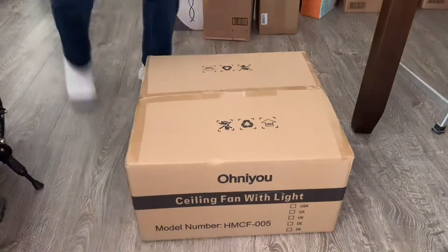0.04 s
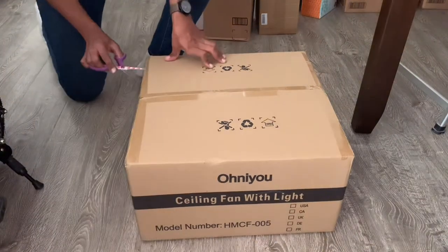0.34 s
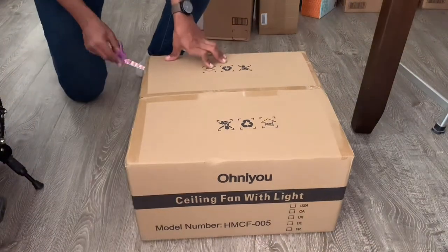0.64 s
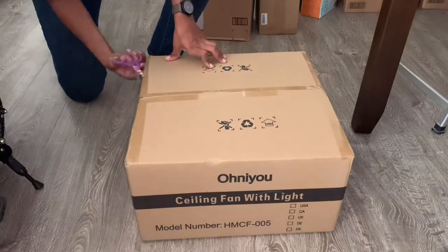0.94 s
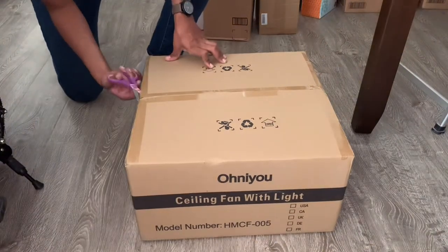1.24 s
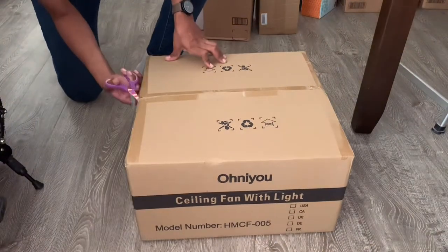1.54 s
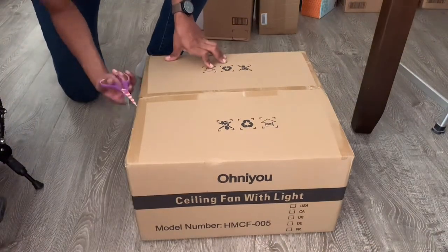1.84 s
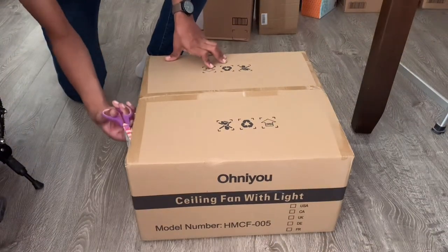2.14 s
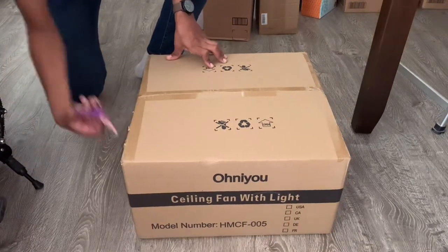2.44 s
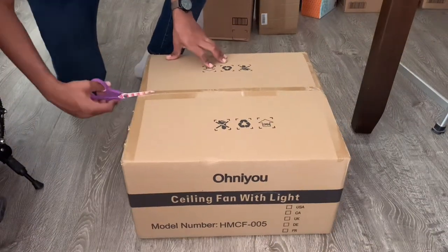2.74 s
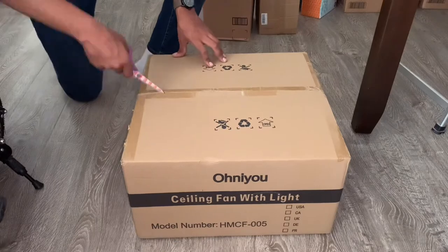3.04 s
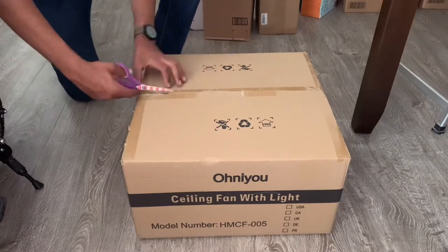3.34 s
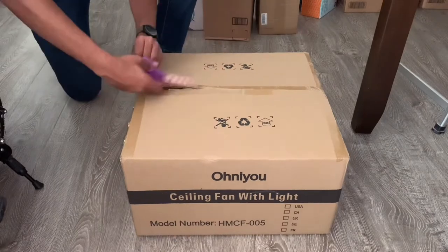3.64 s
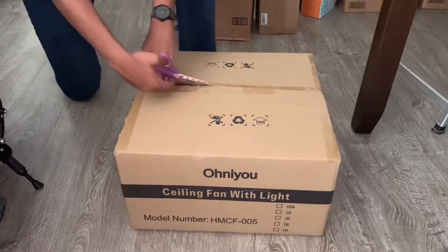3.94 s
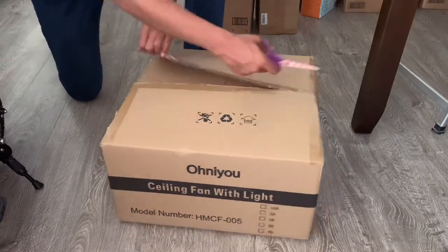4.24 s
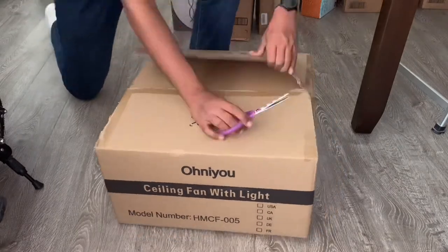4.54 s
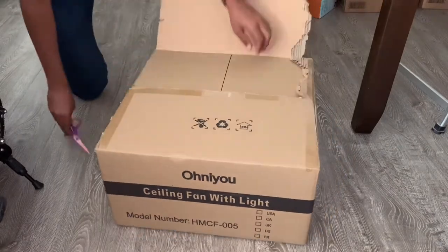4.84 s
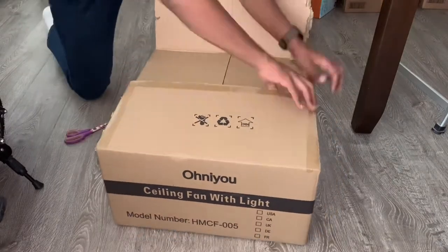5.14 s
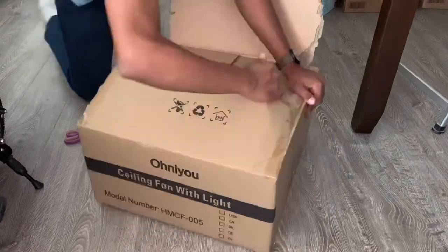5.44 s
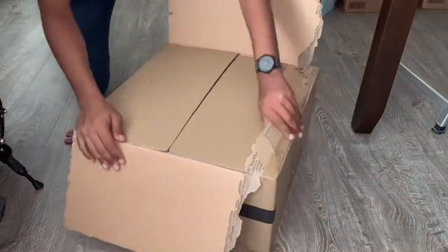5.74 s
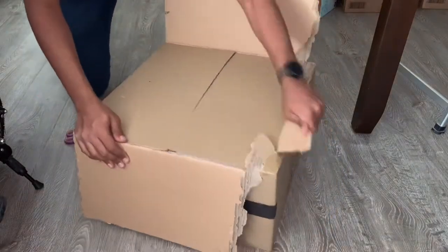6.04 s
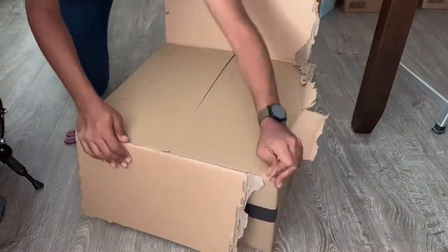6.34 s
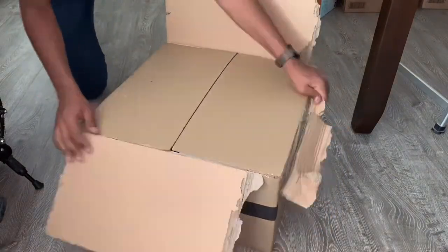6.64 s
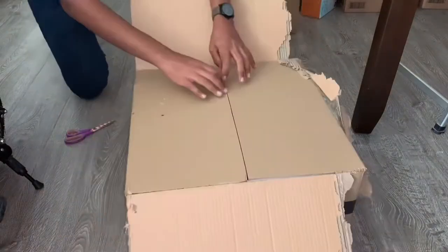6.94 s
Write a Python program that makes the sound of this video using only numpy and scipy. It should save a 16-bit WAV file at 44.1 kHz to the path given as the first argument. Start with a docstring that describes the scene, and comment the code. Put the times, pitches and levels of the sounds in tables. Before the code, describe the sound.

Scissors scrape along the tape of a cardboard box, poking and sawing so that tape and board snap and tear in short bursts. The cracks grow louder, with hands bumping the hollow box. The scissors clatter lightly onto the floor, then the flaps are ripped open, rubbing and knocking. It sounds close, in a small quiet room with faint far traffic and a distant motor.

```python
"""Scissors open a taped cardboard box on a wooden floor, in a small room with far traffic.
The blade rubs along the tape; from 0.5 s it pokes and saws, and tape and board snap and tear in bursts
of fibre breaks. Each force rings the panels and the hollow box. From 1.5 s a faint distant motor rises
and falls, and hands start to bump the box. At 4.3-5 s the scissors clatter in the hand and on the
floor. Then the flaps are ripped open, scraping and knocking."""
import sys
import numpy as np
from scipy import signal
from scipy.fft import rfft, irfft, next_fast_len
from scipy.io import wavfile

SR = 44100
rng = np.random.default_rng(int(sys.argv[2]) if len(sys.argv) > 2 else 0)


def bounce(signal):
    """Save signal as a 16-bit WAV file at the path given by the first command-line argument."""
    frames = np.transpose(np.atleast_2d(signal))
    limited = np.clip(frames, -1, 1)
    pcm = np.round(limited * 32767).astype(np.int16)
    wavfile.write(sys.argv[1], SR, pcm)


N = 316505
SIZE = 8192  # samples per event
LEAD_S, BLOW_S = 0.01, 0.01  # lead-in of an event; time over which a blow's level holds

# body, crack and hiss ranges: low f/Hz, high f/Hz
RANGES = [(180, 800), (800, 4000), (4000, 16000)]
# force spectrum of tears and scissor ticks: f/Hz, gain/dB
SHARP_COLOUR = [(25, -38), (110, -35), (170, -43), (260, -20), (600, -14), (1500, -8), (3500, -4.5),
                (5000, 1), (9000, 2.5), (16000, 1.5)]


def undb(db):
    """Decibels to gain."""
    return 10 ** (np.asarray(db) / 20)


def bins(size):
    """FFT frequencies in Hz, floored at 1."""
    return np.maximum(np.arange(size // 2 + 1) * SR / size, 1)


def shape(points, hz):
    """Gain of an (f/Hz, gain/dB) curve on a log-frequency axis."""
    f, db = np.transpose(points)
    return undb(np.interp(np.log(hz), np.log(f), db))


def walk(rate_hz):
    """Gaussian values at rate_hz, joined by straight lines."""
    steps = np.arange(0, N / SR + 1, 1 / rate_hz)
    return np.interp(np.arange(N) / SR, steps, rng.standard_normal(len(steps)))


def add(out, start_s, wave):
    """Mix a wave in at start_s."""
    i = max(int(start_s * SR), 0)
    out[:, i:i + wave.shape[1]] += wave[:, :max(N - i, 0)]


def resonance(hz, centre_hz, width_hz, lift_db):
    """Causal resonant peak or dip."""
    return 1 + (undb(lift_db) - 1) / (1 + 1j * (hz ** 2 - centre_hz ** 2) / (hz * width_hz))


def stereo(pair, hz):
    """Mid and side spectra to left and right; treble spreads wider."""
    # side against mid: f/Hz, gain/dB
    width = [(100, -19), (300, -14), (1100, -13), (2200, -5.5), (4500, -2.5), (14000, -0.5)]
    return pair[0] + np.array([[1], [-1]]) * pair[1] * shape(width, hz)


def range_rms(spectrum, hz):
    """Rms of body, crack and hiss."""
    power = np.abs(spectrum) ** 2 / (2 * len(hz) ** 2)
    return np.sqrt([power[(hz >= lo) & (hz < hi)].sum() for lo, hi in RANGES])


def event_wave(pair, levels_db, length_s):
    """Mid and side spectra to a stereo wave, each range scaled to its level over length_s."""
    hz, count = bins(SIZE), len(levels_db)
    centres_hz = np.sqrt(np.prod(RANGES, axis=1))[:count]
    for _ in range(3):
        gain = undb(levels_db) * np.sqrt(length_s * SR / SIZE) / range_rms(pair[0], hz)[:count]
        pair = pair * np.exp(np.interp(np.log(hz), np.log(centres_hz), np.log(gain)))
    return irfft(stereo(pair, hz), SIZE)


def coloured_noise(colour):
    """Steady stereo noise, unit rms."""
    size = next_fast_len(N, True)
    hz = bins(size)
    white = stereo(rfft(rng.standard_normal((2, size))), hz)
    noise = irfft(white * shape(colour, hz), size)[:, :N]
    return noise / noise.std()


def room_tone(air_db=-69.5):
    """Steady room air; far traffic swells and ebbs."""
    # air spectrum: f/Hz, relative density/dB
    air_colour = [(25, -34), (70, -58), (110, -19), (160, -4.5), (240, 15), (400, -3.5), (800, 8),
                  (1500, -47), (4000, -11), (16000, -66)]
    # traffic rumble: t/s, level/dB
    traffic_levels = [(0, -70), (1.4, -73), (1.7, -60.5), (2.05, -55), (2.4, -56), (2.7, -55.5), (3.3, -55),
                      (3.75, -60.5), (4.6, -50.5), (5.1, -55.5), (5.9, -61.5), (7.17, -59.5)]
    # traffic spectrum: f/Hz, relative density/dB
    traffic_colour = [(25, -74), (90, -41), (150, -12), (240, -0.5), (400, 2), (550, -4), (800, -7.5),
                      (1200, -13.5), (2000, -31), (5000, -67)]
    swell = undb(np.interp(np.arange(N) / SR, *np.transpose(traffic_levels)))
    return coloured_noise(air_colour) * undb(air_db) + coloured_noise(traffic_colour) * swell


def box(hz):
    """Response of the hollow box and its panels."""
    # resonances: f/Hz, width/Hz, lift/dB
    modes = [(233, 8, 9), (314.6, 76, 10), (396.5, 49, 10), (546, 79, 8.5), (729, 116, 11), (1075, 69, 5.5),
             (1300, 130, 5.5), (2010, 163, 4), (3290, 42, 1), (3660, 100, -3.5), (3780, 130, 4),
             (10830, 50, -8)]
    return np.prod([resonance(hz, *mode) for mode in modes], axis=0)


def panel(direct, high_t60_s, low_t60_s, room_db, modes=3, lag_s=0.001471, room_t60_s=0.069):
    """Mid and side response of one spot of board: first wave, edge reflections, then the room."""
    t, hz = np.arange(SIZE) / SR, bins(SIZE)
    noise = rng.standard_normal((2, SIZE))
    room = undb(-60 * t / room_t60_s) * (1 - np.exp(-t / 0.012))
    room = undb(room_db) * room / np.linalg.norm(room)
    tails = []
    for t60_s in (low_t60_s, high_t60_s):
        ring = undb(-60 * t / t60_s)
        tails.append(rfft(noise * (ring / np.linalg.norm(ring) + room)))
    low = 1 / (1 + (hz / 1100) ** 2)
    pair = low * tails[0] + (1 - low) * tails[1]
    # first wave: slightly out of phase between left and right
    pair = pair + direct * np.array([[1], [1j * rng.normal(0.08, 0.22)]])
    for mode_hz in np.exp(rng.uniform(np.log(900), np.log(12000), size=modes)):
        pair = pair * resonance(hz, mode_hz, 40 + 0.025 * mode_hz, lift_db=4)
    # bending waves: lows arrive late
    return pair * np.exp(-4j * np.pi * lag_s * np.sqrt(1000 * hz) * np.exp(-hz / 14000))


def fibres(size, rate_hz, spread_db):
    """Tiny breaks at random times: many faint, a few strong."""
    hit = rng.random(size) < rate_hz / SR
    strength = undb(spread_db * np.minimum(rng.exponential(size=size), 4))
    return hit * strength * rng.choice([-1, 1], size)


def coarse_fibres(rate_hz=45, base_db=16.5, spread_db=2.5, decay_cycles=1.17, low_hz=900, high_hz=10000):
    """Coarse fibres let go at random; each rings a few cycles at its own pitch."""
    out, t = np.zeros((1, N)), np.arange(1024) / SR
    for when, pitch, rank in rng.random((int(rate_hz * N / SR), 3)):
        hz = low_hz * (high_hz / low_hz) ** pitch
        ring = np.sin(2 * np.pi * hz * t) * np.exp(-t * hz / decay_cycles)
        db = base_db + spread_db * min(-np.log(1 - rank), 4) + 2 * np.log2(hz / high_hz)
        add(out, when * N / SR, ring[None] / np.linalg.norm(ring) * undb(db))
    return out[0]


def rub_gains(db, bright_db, body_db=-3.5):
    """Body, crack and hiss gains; brightness trades body for hiss."""
    return undb([db + body_db - bright_db, db, db + bright_db])


def contact(attack_s=0.018, release_s=0.0081, firm_db=-55, bright_db_per_db=0.274):
    """Sliding strength per range: shifting hands, duller when light, plus strokes."""
    # hands shifting on the board: t/s, level/dB
    shifting = [(0, -63.5), (.2, -77), (.45, -65), (.75, -76), (1.4, -70), (1.8, -77.5), (2.55, -68.5),
                (2.8, -61), (3.3, -60.5), (3.7, -61.5), (4.1, -53.5), (4.4, -58.5), (4.601, -53),
                (5.2, -64), (5.6, -55.5), (5.92, -59), (6.3, -57), (7.17, -66)]
    # blade along tape, later flap on flap: t/s, length/s, level/dB, brightness/dB
    strokes = [(0.074, 0.091, -58, -3.5), (0.314, 0.036, -49, -1.5), (0.499, 0.12, -61.5, 5),
               (0.633, 0.018, -52.5, 3), (0.819, 0.099, -56, 2.5), (0.934, 0.073, -52.5, 0.5),
               (1.164, 0.051, -51, -1), (1.232, .035, -57, 2.5), (1.505, 0.038, -59.5, 0.5),
               (1.568, .085, -55, -1), (1.848, 0.14, -58, 0.5), (2.004, 0.051, -55, 1),
               (2.067, 0.14, -52.5, -3), (2.209, 0.083, -52, -2), (2.315, 0.036, -59.5, -7.5),
               (2.354, 0.077, -51, -3), (2.6, 0.07, -62, -1.5), (2.732, 0.057, -53.5, -1.5),
               (2.828, 0.022, -54.5, -2), (2.945, 0.062, -50.5, 0.5), (3.116, 0.12, -56.5, -0.5),
               (3.28, 0.028, -71.5, 15), (3.492, 0.087, -53, 1.5), (3.713, 0.038, -52, -7),
               (3.899, 0.02, -52, -10), (3.957, 0.24, -54.5, -1), (4.161, 0.24, -53, 0.5),
               (4.453, 0.155, -46, -2.5), (4.764, 0.046, -47.5, -4), (5.083, 0.048, -54, 2),
               (5.144, 0.022, -43, -1), (5.181, 0.04, -46, 1), (5.26, 0.068, -48, 1),
               (5.345, .185, -48, 1.5), (5.572, 0.034, -44.5, 0), (5.719, 0.12, -51, 4.5),
               (5.99, 0.17, -54.5, 5), (6.103, 0.17, -55, -1), (6.264, 0.25, -50.5, 1.5),
               (6.514, 0.027, -55, -5), (6.61, 0.25, -51, 0), (6.745, 0.084, -51, 2),
               (6.862, 0.15, -57, 3.5)]
    hands_db = np.interp(np.arange(N) / SR, *np.transpose(shifting))
    power = rub_gains(hands_db, bright_db_per_db * (hands_db - firm_db)) ** 2
    t = np.arange(SR // 2) / SR
    for start_s, length_s, db, bright_db in strokes:
        push = np.minimum(t / attack_s, 1) * np.exp(-np.maximum(t - length_s, 0) / release_s)
        add(power, start_s, np.outer(rub_gains(db, bright_db), push) ** 2)
    return np.sqrt(power)


def rubbing(grip_db=5, grip_hz=28, pressure_db=3.2, spots=6):
    """Sliding contact catches and slips, wandering between spots on the board."""
    # friction spectrum: f/Hz, gain/dB
    colour = [(25, -59), (110, -7), (160, 0), (240, 3), (600, -4), (1200, -2.5), (2200, -3), (4500, -7),
              (9000, -9.5), (16000, -9)]
    size = next_fast_len(N, True)
    hz = bins(size)
    pair, pressure = 0, undb(pressure_db * walk(45))
    for _ in range(spots):
        grip = undb(grip_db * walk(grip_hz)) * pressure
        force = grip * (fibres(N, rate_hz=1300, spread_db=3) + coarse_fibres())
        spot = irfft(panel(direct=0.37, high_t60_s=0.029, low_t60_s=0.069, room_db=-20, modes=2))
        pair = pair + signal.oaconvolve(force[None], spot, axes=1)[:, :N]
    pair = rfft(pair, size) * shape(colour, hz) * box(hz)
    # each range follows its own envelope
    above_body, above_crack = (1 / (1 + (edge_hz / hz) ** 6) for edge_hz, _ in RANGES[1:])
    shares = (1 - above_body, above_body - above_crack, above_crack)
    out, left_right = 0, stereo(pair, hz)
    for share, rms, envelope in zip(shares, range_rms(pair[0], hz), contact()):
        out = out + irfft(left_right * share, size)[:, :N] / rms * envelope
    return out


def rips(ring_db=5, rise_share=0.35):
    """A tear runs through tape or board: fibre breaks swell and die away."""
    # tears: t/s, length/s, body/dB, crack/dB, hiss/dB, ring f/Hz
    tears = [(0.505, 0.016, -53, -44.5, -47, 1230), (0.53, 0.027, -65, -49, -49.5, 4250),
             (0.893, 0.025, -76, -53.5, -66, 1990), (1.004, 0.017, -58, -49.5, -51, 2020),
             (1.359, 0.011, -54, -50, -48, 1880), (2.028, 0.038, -60, -50.5, -65.5, 2000),
             (2.151, 0.027, -59, -53, -62, 900), (2.731, .03, -76, -57, -70, 2120),
             (2.977, 0.03, -51, -39, -49, 1970), (3.184, .025, -49.5, -41.5, -43.5, 4140),
             (3.233, 0.022, -82, -49, -54, 2150), (3.341, 0.013, -73, -44, -55.5, 2070),
             (3.424, 0.047, -68, -53.5, -53.5, 4020), (3.589, 0.073, -44, -44, -46, 6200),
             (3.82, 0.053, -61, -50.5, -41, 1800), (4.525, 0.054, -54, -32.5, -34, 3080),
             (5.361, 0.0092, -37.5, -45.5, -43, 3490), (5.427, 0.043, -40, -36, -31, 1890),
             (5.756, 0.04, -46.5, -51, -35.5, 3160), (5.882, 0.05, -75, -54.5, -51.5, 2660),
             (5.97, 0.06, -61, -53.5, -45, 6540), (6.318, 0.028, -47, -52, -46, 880),
             (6.384, 0.026, -37, -35.5, -32.5, 1110), (6.442, 0.054, -48.5, -49.5, -42, 5700),
             (6.599, 0.061, -58, -47.5, -47, 970)]
    out, hz, t = np.zeros((2, N)), bins(SIZE), np.arange(SIZE) / SR
    colour = shape(SHARP_COLOUR, hz) * box(hz)
    for start_s, length_s, *levels_db, ring_hz in tears:
        pull = np.interp(t - LEAD_S, [0, rise_share * length_s, length_s], [0, 1, 0])
        force = rfft(pull * fibres(SIZE, rate_hz=2300, spread_db=4.6))
        board = panel(direct=0.8, high_t60_s=0.022, low_t60_s=0.035, room_db=-17)
        pair = force * board * colour * resonance(hz, ring_hz, 0.3 * ring_hz, ring_db)
        add(out, start_s - LEAD_S, event_wave(pair, levels_db, length_s))
    return out


def snaps(ring_db=6, splinter_s=0.0024, splinter_db=-7):
    """Tape or board gives way at once: a sharp kick to the panel amid splintering fibres."""
    # breaks: t/s, body/dB, crack/dB, hiss/dB, ring f/Hz
    breaks = [(0.507, -54, -59, -50, 8100), (0.548, -43.5, -37.5, -38, 704), (0.572, -65, -45, -48, 7890),
              (0.583, -41, -32.5, -35, 720), (0.734, -55, -61.5, -71, 1380), (1.089, -63, -59, -74, 1120),
              (1.733, -60, -58, -78, 1150), (1.837, -48.5, -51.5, -63, 1240),
              (2.136, -62, -44, -49.5, 2476), (2.39, -61, -43, -55, 2070), (2.426, -45, -48, -68, 850),
              (2.529, -50, -51, -62.5, 1365), (2.577, -52, -50, -93, 1190), (2.916, -54, -49, -63, 2080),
              (2.962, -41.5, -40.5, -56, 1760), (2.992, -43, -39, -32.5, 4700),
              (3.049, -85, -46, -45, 2110), (3.163, -68, -37, -37.5, 1870), (3.173, -79, -40, -50, 2060),
              (3.507, -35.5, -32.5, -31.5, 6250), (3.516, -41, -29, -31, 1860),
              (3.55, -85, -50, -46.5, 4520), (3.615, -70, -38.5, -34.5, 6440), (3.625, -52, -33, -38, 6430),
              (3.632, -66, -37.5, -36, 6350), (3.642, -37.5, -42, -53, 1520), (3.83, -40, -32, -35.5, 1650),
              (4.052, -47, -40, -46, 2000), (4.122, -45, -46, -58, 2000), (4.206, -34, -25.5, -32, 3300),
              (4.24, -24, -18, -26, 1160), (4.27, -28.5, -30, -38, 484), (4.364, -36.5, -38.5, -46.5, 830),
              (4.458, -63, -41.5, -44.5, 3070), (4.49, -37.5, -39, -44, 1480),
              (4.53, -39.5, -32, -33.5, 5200), (4.55, -31.5, -24, -28, 3160),
              (4.718, -51, -39.5, -41, 2230), (5.11, -40, -42.5, -46, 1940), (5.374, -38.5, -26, -21, 3470),
              (5.429, -42, -36.5, -34, 1760), (5.45, -41, -20.5, -24.5, 1810),
              (5.463, -34.5, -41, -30.5, 6800), (5.654, -56, -43, -48, 1480),
              (5.709, -37.5, -41.5, -46.5, 1450), (5.775, -59, -32, -32, 3000),
              (5.782, -45, -32.5, -33, 7330), (5.988, -59, -45, -26.5, 6600), (6.015, -73, -73, -39, 6650),
              (6.097, -47, -54, -40, 8400), (6.231, -60, -46.5, -73, 1440), (6.319, -43, -41, -78, 1090),
              (6.61, -43.5, -40.5, -59, 1000), (6.672, -50, -41.5, -69, 1780),
              (6.794, -41.5, -35.5, -52, 1450), (6.965, -62, -43.5, -45, 4460),
              (7.059, -74, -29.5, -28, 8300)]
    # force spectrum: f/Hz, gain/dB
    force_colour = [(25, -28), (110, -39), (170, -2), (260, -1.5), (600, 3), (1500, 3.5), (3500, 1.5),
                    (5000, -0.5), (9000, -1.5), (16000, -7)]
    out, hz, t = np.zeros((2, N)), bins(SIZE), np.arange(SIZE) / SR
    colour = shape(force_colour, hz) * box(hz)
    kick = np.exp(-2j * np.pi * hz * LEAD_S)
    burst = np.exp(-np.abs(t - LEAD_S - splinter_s / 2) / splinter_s)
    for start_s, *levels_db, ring_hz in breaks:
        splinters = fibres(SIZE, rate_hz=6000, spread_db=7.5) * burst
        force = kick + undb(splinter_db) * rfft(splinters / np.linalg.norm(splinters))
        board = panel(direct=1.1, high_t60_s=0.028, low_t60_s=0.05, room_db=-11)
        pair = force * board * colour * resonance(hz, ring_hz, 0.08 * ring_hz, ring_db)
        add(out, start_s, thud(np.mean(levels_db[1:])))
        add(out, start_s - LEAD_S, event_wave(pair, levels_db, BLOW_S))
    return out


def thud(snap_db, hard_snap_db=-22, hard_thud_db=-55, db_per_db=1.4, decay_s=0.0036):
    """A brief, deep, dull thump under each snap, faint unless the snap is hard."""
    pulse = np.exp(-np.arange(SIZE) / SR / decay_s)
    db = hard_thud_db + db_per_db * (snap_db - hard_snap_db)
    return np.tile(pulse / np.linalg.norm(pulse), (2, 1)) * np.sqrt(BLOW_S * SR) * undb(db)


def motor_line(track, fifth_db, waver=0.0043, flutter=0.47):
    """A gliding motor order and the next a fifth above, unsteady after passing the walls."""
    t = np.arange(N) / SR
    times_s, hz, db = np.transpose(track)
    pitch_hz = np.interp(t, times_s, hz) * (1 + waver * walk(29.88))
    phase = 2 * np.pi * np.cumsum(pitch_hz) / SR
    tone = np.sin(phase) * (1 + flutter * walk(25))
    fifth = undb(fifth_db) * np.sin(1.5 * phase) * walk(25)
    return np.sqrt(2) * (tone + fifth) * np.interp(t, times_s, undb(db), left=0, right=0)


def motor():
    """Distant motor: an upper whine, then a lower drone."""
    # whine: t/s, f/Hz, level/dB
    whine = [(1.5, 723, -74), (1.72, 738, -63.5), (1.9, 764, -70), (2.02, 763, -53.5), (2.17, 756, -55),
             (2.32, 726, -53.5), (2.52, 722, -64), (2.8, 678, -66)]
    # drone: t/s, f/Hz, level/dB
    drone = [(2.55, 250, -66), (2.73, 243, -58), (2.84, 236, -54.5), (2.95, 254, -50.5), (3.05, 246, -58.5),
             (3.2, 220, -60.5), (3.4, 200, -77), (4.2, 245, -75), (4.4, 240, -57.5), (4.65, 228, -58),
             (4.88, 208, -57), (5.0, 226, -62), (5.2, 235, -60)]
    return motor_line(whine, fifth_db=-7.5) + motor_line(drone, fifth_db=-17.5)


def knocks(ring_db=6, main_mode_hz=400, crack_offset_db=-8.5, crack_db_per_octave=4):
    """Soft blows wake the low box resonances; stiffer, higher spots crack more."""
    # hands and flaps bumping the box: t/s, body/dB, ring f/Hz
    bumps = [(1.784, -51, 350), (3.476, -45.5, 412), (3.744, -47, 710), (3.893, -40, 720),
             (3.917, -42.5, 460), (3.982, -34.5, 560), (4.047, -37.5, 407), (4.442, -33.5, 420),
             (4.711, -35, 724), (5.158, -31, 414), (5.302, -37.5, 450), (5.486, -37, 380),
             (5.53, -35.5, 356), (5.709, -36.5, 400), (6.056, -49.5, 400), (6.167, -36.5, 670),
             (6.274, -38.5, 380), (6.398, -33, 400), (6.546, -36.5, 350), (6.869, -42.5, 390),
             (6.946, -45.5, 292), (7.063, -33, 386), (7.141, -49, 404)]
    # force spectrum: f/Hz, gain/dB
    force_colour = [(25, -36), (110, -50), (180, -13), (300, 15), (600, 4), (1000, -7), (2000, -16),
                    (5000, -26.5), (16000, -34)]
    out, hz = np.zeros((2, N)), bins(SIZE)
    colour = shape(force_colour, hz) * box(hz) * np.exp(-2j * np.pi * hz * LEAD_S)
    for start_s, body_db, ring_hz in bumps:
        crack_db = body_db + crack_offset_db + crack_db_per_octave * np.log2(ring_hz / main_mode_hz)
        board = panel(direct=0.7, high_t60_s=0.075, low_t60_s=0.045, room_db=-12)
        pair = board * colour * resonance(hz, ring_hz, 0.1 * ring_hz, ring_db)
        add(out, start_s - LEAD_S, event_wave(pair, [body_db, crack_db], BLOW_S))
    return out


def scissors(ring_offset_db=-3, mode_spread_db=6.5, tick_hz=2800, tick_offsets_db=(-29, -3, -3.5)):
    """Each contact ticks and rings a new mix of blade modes, damped by the plastic handles."""
    # contacts in the hand and on the floor: t/s, base level/dB
    clinks = [(4.333, -39.5), (4.849, -40.5), (4.916, -42.5), (4.962, -43), (4.979, -41), (4.988, -41.5),
              (5.033, -49)]
    # blade modes: f/Hz, relative level/dB, t60/s
    blades = [(2070, -23, .05), (2400, 4, 0.063), (2630, 22, 0.026), (3000, 3, 0.057), (3310, 6, 0.1),
              (3580, -5, 0.055), (6270, -4, 0.032)]
    out, hz, t = np.zeros((2, N)), bins(SIZE), np.arange(SIZE) / SR
    mode_hz, mode_db, t60_s = np.transpose(blades)[:, :, None]
    colour = shape(SHARP_COLOUR, hz) * resonance(hz, tick_hz, 0.26 * tick_hz, lift_db=7)
    colour = colour * np.exp(-2j * np.pi * hz * LEAD_S)
    for start_s, db in clinks:
        emphasis, detune = rng.standard_normal((2, len(blades), 1))
        phase = 2 * np.pi * mode_hz * (1 + 0.012 * detune) * t
        decays = undb(mode_db + mode_spread_db * emphasis - 60 * t / t60_s)
        ring = np.sum(decays * np.sin(phase), axis=0)
        ring *= np.sqrt(BLOW_S * SR) * undb(db + ring_offset_db) / np.linalg.norm(ring)
        add(out, start_s, np.tile(ring, (2, 1)))
        tick = panel(direct=0.3, high_t60_s=0.017, low_t60_s=0.032, room_db=-4) * colour
        add(out, start_s - LEAD_S, event_wave(tick, db + np.array(tick_offsets_db), BLOW_S))
    return out


def scene(right_db=0.53):
    """All sources, the box slightly to the right."""
    handling = snaps() + rips() + knocks() + rubbing() + scissors()
    pan = undb(np.array([[-right_db], [right_db]]) / 2)
    return handling * pan + motor() + room_tone()


def record(dry):
    """Steep low-pass at 15.7 kHz."""
    return signal.sosfilt(signal.ellip(10, 0.2, 80, 15700, fs=SR, output="sos"), dry)


dry = scene()
out = record(dry)
bounce(out)
```